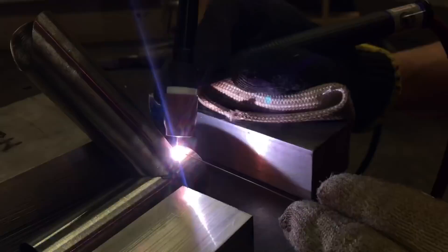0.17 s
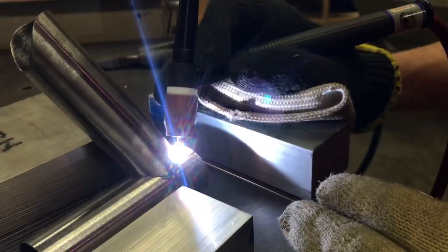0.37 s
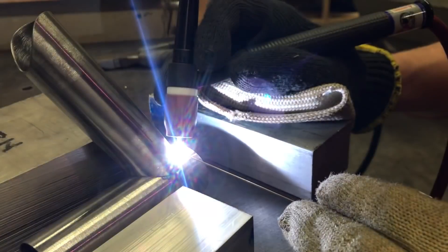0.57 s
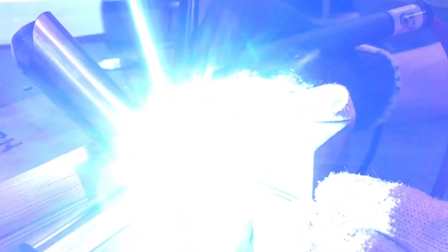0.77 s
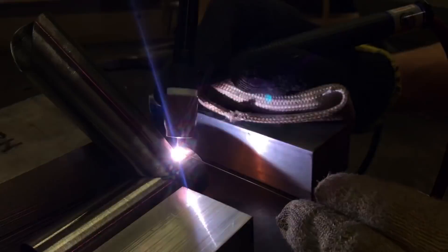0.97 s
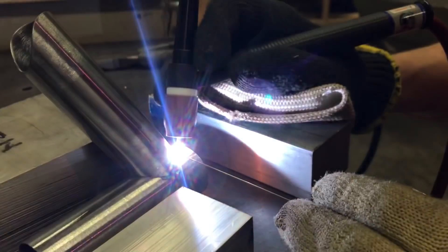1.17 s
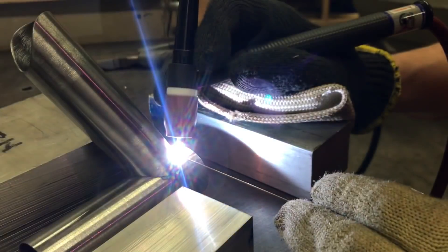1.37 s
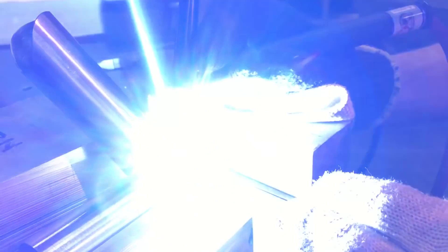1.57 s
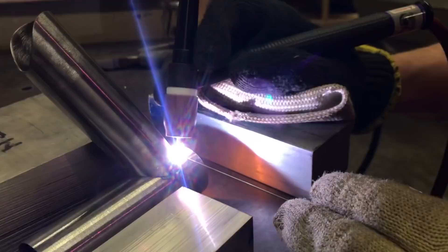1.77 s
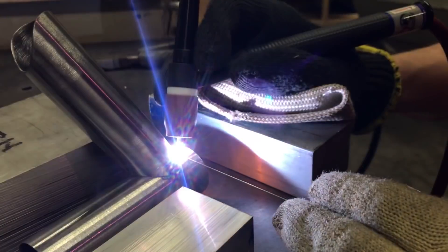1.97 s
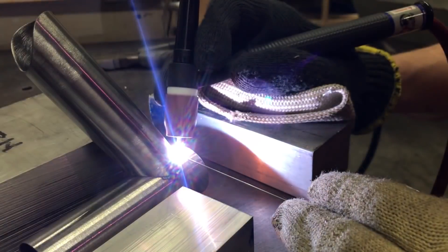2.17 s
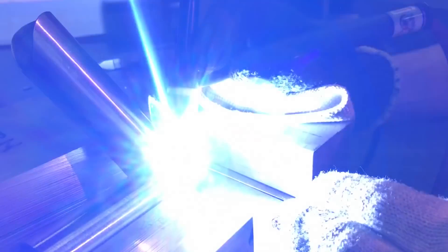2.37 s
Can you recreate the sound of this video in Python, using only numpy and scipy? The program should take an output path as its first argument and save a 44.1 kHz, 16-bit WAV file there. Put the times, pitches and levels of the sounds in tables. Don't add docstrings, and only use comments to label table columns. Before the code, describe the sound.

Welding arc pulses on metal tubing: sharp cracks, gritty low buzz, then fan hum swelling back.

```python
import sys
import numpy as np
from scipy import signal
from scipy.fft import rfft, irfft, next_fast_len
from scipy.io import wavfile
from scipy.ndimage import uniform_filter1d, map_coordinates

SR = 44100
rng = np.random.default_rng(int(sys.argv[2]) if len(sys.argv) > 2 else 0)


def master(y):
    cut = np.clip(np.atleast_2d(y).T, -1, 1)
    pcm = np.round(cut * 32767)
    wavfile.write(sys.argv[1], SR, pcm.astype(np.int16))


def invert_db(level):
    return 10 ** (np.asarray(level, dtype=float) / 20)


N = 105972
TIME = np.arange(N) / SR
SNAP_TIME = np.arange(1, SR // 6) / SR


def unit(x):
    return x / np.sqrt(np.mean(x ** 2) + 1e-20)


def wobble(rate):
    return map_coordinates(rng.standard_normal(400), [np.arange(N) * rate / SR])


def filtered(x, response):
    size = next_fast_len(x.shape[-1] + 8192)
    spectrum = rfft(x, size) * response(np.fft.rfftfreq(size, 1 / SR))
    return irfft(spectrum, size)[..., :x.shape[-1]]


def coloured(x, points):
    f, db = np.transpose(points)
    return filtered(x, lambda hz: invert_db(np.interp(np.log(hz + 1), np.log(f + 1), db, -120, -120)))


def rush(points, patchy_db):
    z = signal.stft(rng.standard_normal(N), nperseg=512)[2]
    field = uniform_filter1d(rng.standard_normal(z.shape), size=5, axis=0)
    field = uniform_filter1d(field, size=6, axis=1)
    patchy = signal.istft(z * invert_db(patchy_db * unit(field)), nperseg=512)[1][:N]
    return unit(filtered(coloured(patchy, points), lambda hz: hz < 15780))


def add(track, s, sound):
    i = round(s * SR)
    if 0 <= i < len(track):
        track[i:i + len(sound)] += sound[:len(track) - i]


# multiple of the blade rate, level in dB.
BLADE_TONES = [(1, -27), (3, -41), (5, -46), (7, -65.5), (8, -47.5)]


def fan_blades():
    blade_hz = 333.2 + 1.44 * wobble(14)
    turn = 2 * np.pi * np.cumsum(blade_hz) / SR
    hum = np.zeros(N)
    for k, db in BLADE_TONES:
        hum += np.sqrt(2) * invert_db(db + 0.65 * wobble(21.92)) * np.sin(k * turn + k * k)
    return hum


# pitch in Hz, width in Hz, level in dB.
HOUSING_NOTES = [(242.8, 20, -37.5), (237, 69, -38.5), (615, 48, -49), (815, 78, -42), (1315, 106, -41.5),
                 (1510, 48, -43.5)]


def fan_housing():
    out = np.zeros(N)
    for centre, width, db in HOUSING_NOTES:
        noise = rng.standard_normal(N)
        note = filtered(noise, lambda hz: 1 / (1 + (2 * (hz - centre) / width) ** 2))
        out += invert_db(db) * unit(note)
    return out


# frequency in Hz, level in dB.
AIR_COLOUR = [(32, -7), (55, -2), (150, -5.5), (500, -6), (1500, -9.5), (2200, -12.5), (5000, -15.5),
              (7500, -29)]
# frequency in Hz, level in dB.
HISS_COLOUR = [(5000, -1), (8500, 0.5), (10000, -1.5), (10500, -7), (11500, -1), (12500, -7), (14500, -6.5),
               (16000, -11.5)]


def fan_air():
    air = invert_db(-28 + 0.4 * wobble(30.9)) * rush(AIR_COLOUR, 0.5)
    return air + invert_db(-41) * rush(HISS_COLOUR, 0.3)


STEP_UP_TIMES = [.1052, .8581, 1.6097, 2.3616]
STEP_DOWN_TIMES = [
    -.5085,
    .2434,
    .99595,
    1.7478,
    2.4995,
]


def high_current():
    pulses = sum(1. * (TIME > up) * (TIME < down) for up, down in zip(STEP_UP_TIMES, STEP_DOWN_TIMES[1:]))
    return uniform_filter1d(pulses, size=80)


def mains_turn():
    return 2 * np.pi * 120 * (TIME - .9885)


# frequency in Hz, level in dB.
WHINE_COLOUR = [(11500, -30), (13000, 3), (14000, 2), (15000, 4), (15800, -12)]


def weak_arc_whine():
    bursts = 1 + .85 * np.cos(mains_turn())
    return (1 - high_current()) * invert_db(-49) * rush(WHINE_COLOUR, 0.3) * bursts


def crack(hold_s, colour, rings):
    t = SNAP_TIME
    fade = invert_db(-60 * np.maximum(t - hold_s, 0) / .0022)
    fizz = invert_db(-24 - 60 * t / .012)
    burst = (fade + fizz) * unit(coloured(rng.standard_normal(len(t)), colour))
    ring = sum(way * invert_db(db - 60 * t / t60) * np.sin(2 * np.pi * hz * t) for hz, db, t60, way in rings)
    return invert_db(-7) * burst / np.abs(burst).max() + ring


def pressure_swing(knock_db, thump_db, thump_t60):
    t, crest_s = SNAP_TIME, .0012
    sweep = np.cos(3.1 * np.log(t / crest_s) + 2 * np.pi * 18 * (t - crest_s))
    knock = sweep * np.clip(t / crest_s, 0, 1) ** 2 * np.exp(-(t / .0022 / 2) ** 2)
    thump = sweep * (1 - np.exp(-(t / .0055) ** 2))
    return invert_db(knock_db) * knock + invert_db(thump_db - 60 * t / thump_t60) * thump


def snaps(times, levels, colour, rings, way, thump_t60, hold_s=0):
    out = np.zeros(N)
    for s, (crack_db, knock_db, thump_db, *_) in zip(times, levels):
        add(out, s, invert_db(crack_db) * crack(hold_s, colour, rings))
        add(out, s + hold_s, way * pressure_swing(knock_db, thump_db, thump_t60))
    return out


SPUTTER_TIMES = [.0991, .8518, 1.6041, 2.3557]
# crackle in dB, knock in dB, thump in dB.
SPUTTER_LEVELS = [
    (0, -15, -27),
    (0, -25, -23),
    (0, -32, -9),
    (0, -10.5, -10),
]
# frequency in Hz, level in dB.
CRACKLE_COLOUR = [(900, 18), (1500, -38), (2500, -11), (4500, 1), (6300, -13), (8000, 2), (12000, -14.5),
                  (15500, -1)]
# pitch in Hz, level in dB, 60 dB fade in seconds, first swing up or down.
SPUTTER_RINGS = [(1055, -14, 0.011, 0.8), (4440, -17, 0.0025, 1)]


def sputters():
    return snaps(SPUTTER_TIMES, SPUTTER_LEVELS, CRACKLE_COLOUR, SPUTTER_RINGS, -1, .045, hold_s=.0013)


# crack in dB, knock in dB, thump in dB, the phone's gain just after in dB.
STEP_UP_LEVELS = [
    (10, -1.5, -13, -19.5),
    (12, 8, 17, -19.5),
    (12, 10.5, 19.5, -18.5),
    (12, 14, 19, -20.5),
]
# frequency in Hz, level in dB.
CRACK_COLOUR = [(1200, -2), (2000, -3), (3300, 8), (8000, 19.5), (12000, -1), (14000, -6), (17000, -65)]
# pitch in Hz, level in dB, 60 dB fade in seconds, first swing up or down.
STEP_UP_RINGS = [(5800, 2, .0012, -1), (1800, -2, .005, 1)]


def steps_up():
    return snaps(STEP_UP_TIMES, STEP_UP_LEVELS, CRACK_COLOUR, STEP_UP_RINGS, -1, .045)


# multiple of 120 Hz, level in dB.
BUZZ_TONES = [(1, -24), (2, -26.5), (3, -26.5), (4, -30.5), (5, -32.5), (6, -40), (7, -45), (8, -38),
              (9, -44)]
# frequency in Hz, level in dB.
ROAR_COLOUR = [(30, -60), (60, 8.5), (150, -9), (1000, -14.5), (2400, -76), (4000, -40)]
# frequency in Hz, level in dB.
ARC_HISS_COLOUR = [(1500, -8), (4000, 1), (6500, -5), (8200, 1.5), (10500, -4), (12500, -8), (13800, 2.5),
                   (16000, -2)]


def strong_arc():
    turn = mains_turn()
    buzz = np.zeros(N)
    for k, db in BUZZ_TONES:
        level = np.sqrt(2) * invert_db(db + 2.2 * wobble(40))
        buzz -= level * np.cos(k * turn + 0.4 * wobble(44.6))
    roar = invert_db(-19.5 + 1.5 * wobble(25.05)) * rush(ROAR_COLOUR, 2.5) * (1 + 0.55 * np.cos(turn))
    hiss = invert_db(-33.5) * rush(ARC_HISS_COLOUR, 0.3)
    return high_current() * (buzz + roar + hiss)


# start in seconds, level in dB, pitch in Hz, 60 dB fade in seconds.
POOL_HEAVES = [
    (0.113, 4, 54.7, 0.19),
    (0.8832, 4.5, 62, 0.036),
    (0.904, -7, 60, 0.072),
    (1.634, -18, 60, .07),
    (2.386, 0, 50, .07),
]


def pool_heaves():
    out, t = np.zeros(N), SNAP_TIME
    for s, db, hz, t60 in POOL_HEAVES:
        soft_start = 1 - np.exp(-t / 0.0013)
        add(out, s, -invert_db(db - 60 * t / t60) * np.sin(2 * np.pi * hz * t) * soft_start)
    return out


# crack in dB, knock in dB, thump in dB, the phone's gain just after in dB.
STEP_DOWN_LEVELS = [
    (10, 10, 10, -20),
    (9.8, 9.6, 11.4, -18),
    (9.6, 2.4, 3, -17.5),
    (11.3, 14, 16.8, -21.5),
    (10, 10, 10, -20),
]
# pitch in Hz, level in dB, 60 dB fade in seconds, first swing up or down.
STEP_DOWN_RINGS = [(980, -5, .011, 1), (3200, -2, .0035, -1), (14000, -10, .003, 1), (5800, -33, .03, 1)]


def steps_down():
    return snaps(STEP_DOWN_TIMES, STEP_DOWN_LEVELS, CRACK_COLOUR, STEP_DOWN_RINGS, 1, .065)


def scene():
    fan = fan_blades() + fan_housing() + fan_air()
    pulses = sputters() + steps_up() + strong_arc() + pool_heaves() + steps_down()
    return (fan + weak_arc_whine() + pulses)[None]


def ducked(back_s, curve, extra_db):
    times, levels = STEP_UP_TIMES + STEP_DOWN_TIMES, STEP_UP_LEVELS + STEP_DOWN_LEVELS
    s, db = np.transpose(sorted((s, row[-1]) for s, row in zip(times, levels)))
    t = TIME + .0004
    last = np.searchsorted(s, t) - 1
    since = t - s[last]
    low = invert_db(db[last] - extra_db * np.exp(-since / 0.022))
    return low + (1 - low) * (1 - np.exp(-(since / back_s) ** curve))


def roll_off(x):
    return signal.sosfilt(signal.butter(12, 16990, fs=SR, output="sos"), x)


def record(dry):
    treble = filtered(dry, lambda hz: 1 / (1 + (5100 / (hz + 1)) ** 4))
    bass = dry - treble
    mix = bass * ducked(0.35, 2.85, -0.36) + treble * ducked(0.43, 2.57, -5.5)
    mix = mix / (1 + np.abs(mix / .52) ** 6) ** (1 / 6)
    mix = filtered(mix, lambda hz: 1 / (1 + (hz / 16700) ** 60))
    return roll_off(mix)


dry = scene()
out = record(dry)
master(out)
```